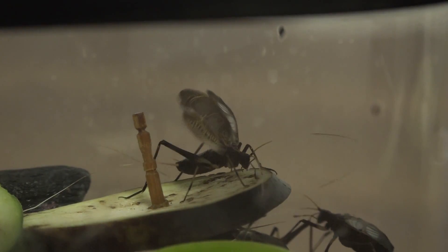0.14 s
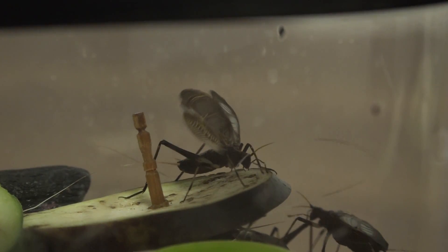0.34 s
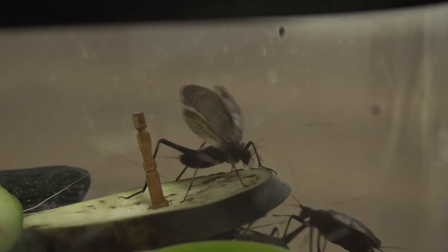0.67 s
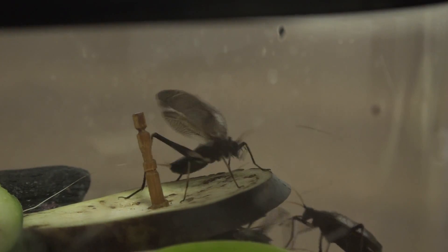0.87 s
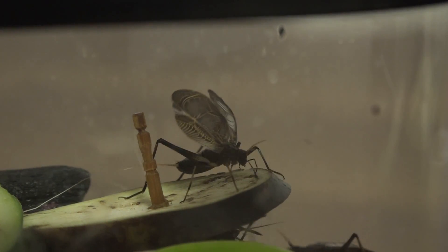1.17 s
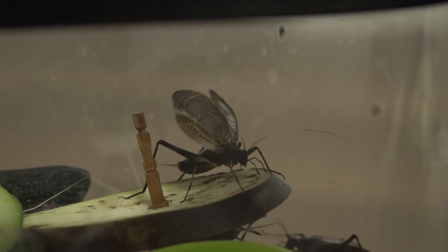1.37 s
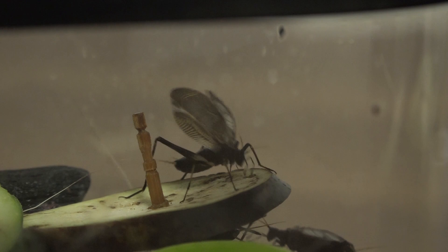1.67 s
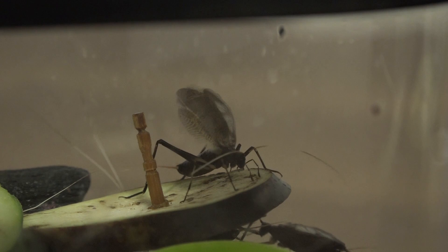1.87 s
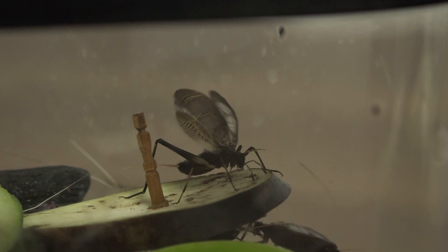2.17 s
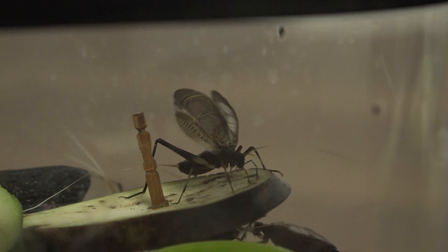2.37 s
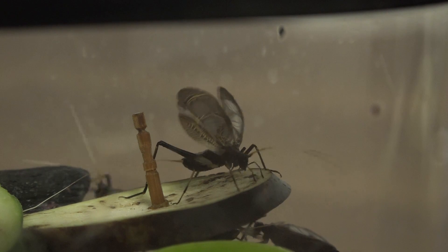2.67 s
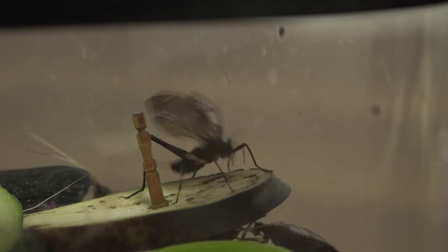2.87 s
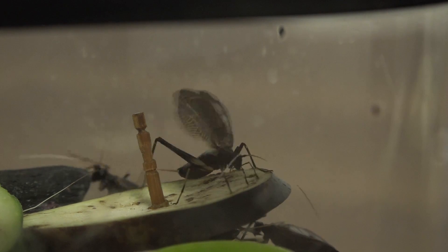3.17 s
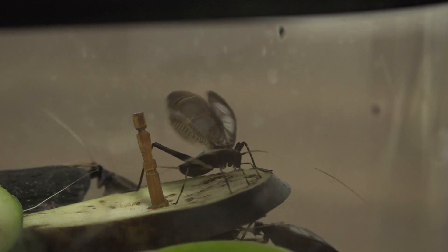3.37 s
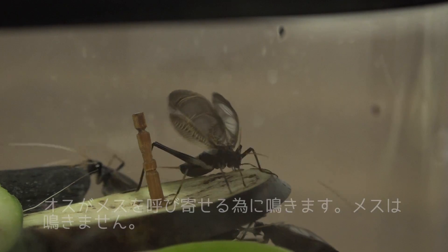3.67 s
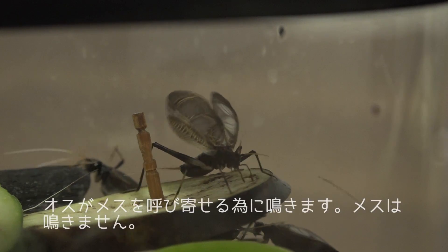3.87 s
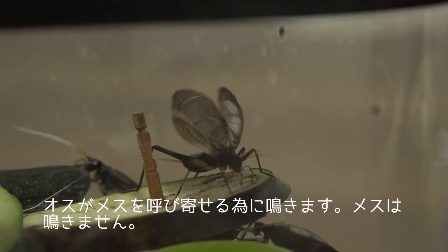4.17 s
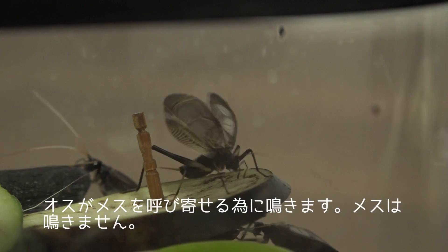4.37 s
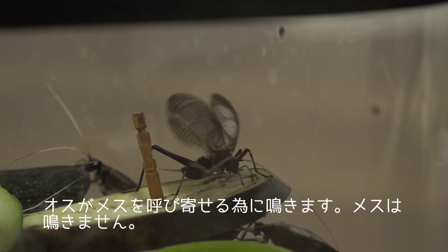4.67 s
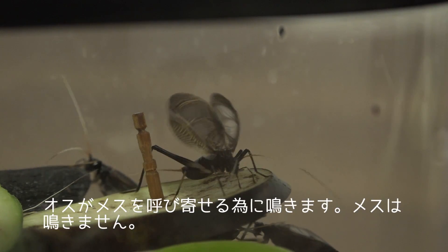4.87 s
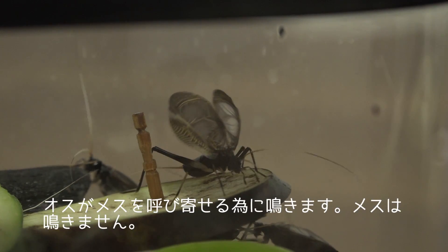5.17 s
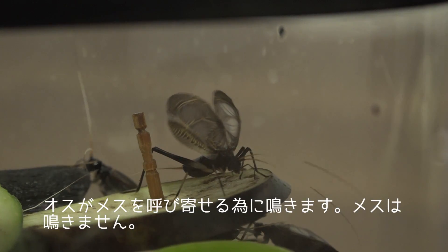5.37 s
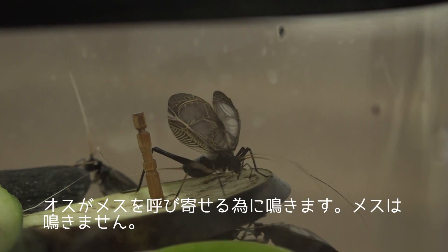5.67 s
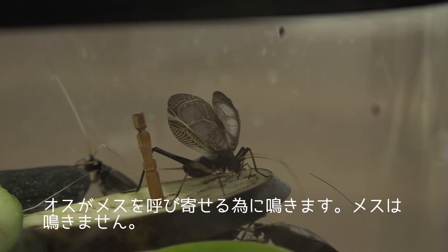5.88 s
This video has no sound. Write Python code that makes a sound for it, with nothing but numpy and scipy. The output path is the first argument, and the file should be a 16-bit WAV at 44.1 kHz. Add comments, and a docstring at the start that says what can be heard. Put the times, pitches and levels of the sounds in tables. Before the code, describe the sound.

In a quiet indoor room, a thin dry insect trill flutters steadily, blurred by hard tank walls. A louder bell cricket joins in separate bursts of clear, high, silvery ringing, strongest in the middle and again just before four seconds, each dying away. Tiny wing-edge scrapes flick past. The close stereo microphone also catches gentle room air and a low, wavering hum, left almost alone at the end.

```python
"""A faint scratchy trill in a quiet, faintly humming room; soon a second bell cricket rings over it.
Both sing in a clear-walled tank near the microphone; the trill stops suddenly just before the end.
Each wing stroke drags a file over a scraper: a short falling tone near 4.6 kHz, overtones, a dry rasp.
The ringing phrases swell and fade, wing edges scratch, and dense wall echoes blur the strokes into a ring.
Behind them: coloured air noise and the wavering sine lines of a mains-driven motor."""
import sys
import numpy as np
from scipy import signal
from scipy.fft import rfft, irfft, next_fast_len
from scipy.io import wavfile
from scipy.ndimage import uniform_filter1d

SR = 44100
rng = np.random.default_rng(int(sys.argv[2]) if len(sys.argv) > 2 else 0)


def unload_wav(signal):
    """Save mono or channel-first audio to the path in sys.argv[1] as 16-bit WAV at rate SR, clipped to [-1, 1]."""
    wavfile.write(
        sys.argv[1],
        SR,
        np.round(np.clip(np.atleast_2d(signal).T, -1, 1) * 32767).astype(np.int16),
    )


N = 266055
T = np.arange(N) / SR  # time [s]

# ringing cricket: (opening stroke time [s], its length [s], its peak [dB], length of following run [s],
# run peak [dB], fade over run [dB], pitch at stroke start [Hz], 2nd harmonic [dB], 3rd harmonic [dB]);
# peaks before the tank, harmonics as for a 0 dB stroke
RINGER_PHRASES = [(0.209, 0.039, -10.5, 0.36, -16, 6.5, 4642, -34, -39.5),
                  (1.957, 0.048, -11.5, 0.36, -14, 1.5, 4652, -35, -38.5),
                  (2.381, .021, -7.5, .22, -7.5, 18, 4620, -36, -42),
                  (3.263, .042, -12.5, 0.51, -14, 9, 4649, -33.5, -38.5),
                  (3.855, .038, -4, .34, -4, 17.5, 4598, -40.5, -39.5),
                  (4.614, 0.039, -12.5, .49, -14, 6.5, 4640, -32.5, -37),
                  (5.178, 0.026, -25.5, 0.52, -28.5, 3, 4623, -34.5, -47.5)]
# effort of the trilling cricket: (time [s], effort [dB])
TRILL_EFFORT = [(.05, -42), (.2, -34.5), (.8, -33.5), (1.8, -31), (2.8, -28.5), (3.6, -30.5), (4.35, -27),
                (5.05, -30.5), (5.3, -38), (5.68, -41.5)]
# wing-edge skids: (time [s], level before the tank [dB], t60 [s])
SCRATCH_EVENTS = [(0.2146, -34, 0.22), (2.018, -42, 0.48), (3.271, -33.5, 0.11), (3.305, -38.5, 0.56),
                  (4.656, -34, 0.11), (5.125, -47.5, 0.13)]
# rasp spectrum before the tank modes: (frequency [Hz], relative level [dB])
RASP_SPECTRUM = [(1500, -25), (3000, -23), (3900, -10), (4600, 9.5), (5100, 3.5), (5750, -8.5),
                 (7200, -9.5), (9000, -6.5), (9700, -15.5), (10800, -21), (11600, -14), (12500, -15.5),
                 (13400, -21), (15700, -13.5)]
# tank modes rung by the rasp: (frequency [Hz], bandwidth [Hz], gain [dB])
TANK_MODES = [(5285, 82, -5), (6225, 120, -0.5), (6590, 130, 0.5), (8290, 220, -7.5)]
# scratch spectrum: (frequency [Hz], relative level [dB])
SCRATCH_SPECTRUM = [(1200, -47), (2500, -16), (4000, -8), (5500, 11.5), (7200, -30), (8300, 5),
                    (10000, -12), (12000, -9.5), (15000, -12)]
# room air spectrum: (frequency [Hz], relative density [dB])
AIR_SPECTRUM = [(15, -28.5), (30, -16), (105, -6), (170, -10.5), (280, -11), (380, -15), (600, -13.5),
                (1050, -12.5), (1500, -18), (2600, -22.5), (3500, -16), (4000, -21), (12000, -23),
                (15500, -30)]
# motor hum lines: (frequency [Hz], rms level [dB])
HUM_LINES = [(49.6, -73), (100, -62), (149, -66.5), (199.5, -71), (299, -74), (732, -79.5), (899, -79.5),
             (1152, -75.5), (1550, -79), (1648, -83.5), (1750, -83)]
# stereo width: (frequency [Hz], side-channel gain [dB])
SIDE_GAIN = [(60, -11.5), (200, -6), (380, -6.5), (700, -9.5), (1300, -15), (2400, -30), (3800, -33.5),
             (4500, -24.5), (5300, -15.5), (7200, -2), (9200, -2), (11200, -5), (11700, -35.5)]

# ringing cricket; the lead-in level is relative to the opening stroke
STROKE_RATE_HZ, STROKE_S, LEAD_IN_DB = 43.2, .024, -5.5
# as it tires, level and pitch sink ever faster
TIRING_POWER, SAG_HZ_PER_DB = 1.486, 3
# trilling cricket: pitch at the start of a stroke, droop within it
TRILL_HZ, TRILL_DROOP_HZ = 4590, 337
# its rasp: level before the tank at 0 dB effort, slope with effort
TRILL_RASP_DB, RASP_DB_PER_EFFORT_DB = -29.5, 0.41
TANK_T60_S, FLUTTER_T60_S = .35, .07
AIR_DB = -60
TRILL_END_S = 5.685
TOP_HZ = 15680


def ringer():
    """The ringing cricket: clean resonant wing strokes in phrases, with a faint friction rasp."""
    tone, force = np.zeros(N), np.zeros(N)
    for *shape, second_db, third_db in RINGER_PHRASES:
        phrase_tone, phrase_force = wings(phrase(*shape), overtones_db=(second_db, third_db),
                                          jitter_hz=21.9, slip_cycles=0.15, swell_power=1.22)
        tone += phrase_tone
        force += phrase_force
    rasp = undb(-50) * force * rasp_noise()
    return tank(tone, wet_db=-4.5) + tank(rasp, wet_db=8)


def phrase(s, opening_s, opening_db, run_s, level_db, fade_db, pitch_hz,
           droop_hz=120, scatter_db=1.53, timing_s=.0008):
    """A light lead-in, a firm opening stroke, then an uneven run that fades and sags as the cricket tires."""
    gap_s = (opening_s + 1 / STROKE_RATE_HZ) / 2
    strokes = [(s - gap_s, opening_db + LEAD_IN_DB, STROKE_S, pitch_hz, droop_hz),
               (s, opening_db, opening_s, pitch_hz, droop_hz)]
    ages_s = np.arange(0, run_s, 1 / STROKE_RATE_HZ)
    losses_db = fade_db * (ages_s / run_s) ** TIRING_POWER
    chance = rng.standard_normal((len(ages_s), 2))
    for age_s, lost_db, (late, loud) in zip(ages_s, losses_db, chance):
        stroke_s = s + gap_s + age_s + timing_s * late
        stroke_db = level_db - lost_db + scatter_db * loud
        stroke_hz = pitch_hz - SAG_HZ_PER_DB * lost_db
        strokes.append((stroke_s, stroke_db, STROKE_S, stroke_hz, droop_hz))
    return strokes


def triller(stroke_rate_hz=43.3, length_s=0.0168, peak_db=8.0, scatter_db=0.5, timing_s=0.00097, grain_db=2):
    """Light, quick strokes that sweep widely and scrape, heard mostly by way of the walls."""
    effort_db = np.interp(T, *np.transpose(TRILL_EFFORT))
    turns = np.cumsum(stroke_rate_hz * (1 + 0.0252 * walk(3))) / SR
    new_turn = np.diff(np.floor(turns), prepend=-1) > 0
    i = np.flatnonzero(new_turn & (T < TRILL_END_S))
    late, loud, sharp = rng.standard_normal((len(i), 3)).T
    strokes = np.column_stack([T[i] + timing_s * late,
                               effort_db[i] + peak_db + scatter_db * loud,
                               np.full(len(i), length_s),
                               TRILL_HZ + 18 * sharp,
                               np.full(len(i), TRILL_DROOP_HZ)])
    tone, force = wings(strokes, overtones_db=(-35.5, -40.5),
                        jitter_hz=60.4, slip_cycles=0.871, swell_power=1.12)
    # the teeth catch unevenly: fine grains
    grains = undb(grain_db * walk(900))
    rasp_db = TRILL_RASP_DB + RASP_DB_PER_EFFORT_DB * effort_db
    rasp = unit(force * grains * rasp_noise()) * undb(rasp_db)
    return tank(tone, wet_db=8.5) + tank(rasp, wet_db=7)


def wings(strokes, overtones_db, jitter_hz, slip_cycles, swell_power):
    """Tone and contact force of file strokes (time [s], peak [dB], length [s], start pitch [Hz], droop [Hz])."""
    tone, force = np.zeros(N), np.zeros(N)
    unevenness_hz = jitter_hz * walk(500)
    strokes = np.array(sorted(map(tuple, strokes)))
    # the wing still rings when the next stroke takes hold: phase carries over, give or take a slip
    ringing_cycles = np.cumsum(np.interp(T, strokes[:, 0], strokes[:, 3])) / SR
    slips_cycles = slip_cycles * rng.standard_normal(len(strokes))
    for (s, db, length_s, _, droop_hz), slip in zip(strokes, slips_cycles):
        first = max(int((s - length_s / 2) * SR), 0)
        last = min(int((s + length_s / 2) * SR), N)
        i = np.arange(first, last)
        travel = np.clip((T[i] - s) / length_s + .5, 0, 1)
        # the file slows as the wings close: pitch droops late in the stroke
        bend_cycles = np.cumsum(unevenness_hz[i] - droop_hz * travel ** 3) / SR
        phase = 2 * np.pi * (ringing_cycles[i] + slip + bend_cycles)
        grip = np.sin(np.pi * travel) ** swell_power
        tone[i] += undb(db) * grip * np.sin(phase)
        # a firm stroke locks to the wing's resonance: overtones grow half as fast in dB
        overtones = sum(undb(d) * np.sin(k * phase) for k, d in enumerate(overtones_db, 2))
        tone[i] += undb(db * .5) * grip * overtones
        force[i] += grip
    return tone, force


def rasp_noise():
    """Friction noise that rings the tank modes, rms 1."""
    friction = noise(RASP_SPECTRUM)
    rasp = friction.copy()
    for hz, width_hz, db in TANK_MODES:
        b, a = signal.iirpeak(hz, hz / width_hz, fs=SR)
        rasp += undb(db) * signal.lfilter(b, a, friction)
    return unit(rasp)


def scratches():
    """A wing edge skids over the file: a bright noise burst that trails off."""
    envelope = np.zeros(N)
    for s, db, t60_s in SCRATCH_EVENTS:
        envelope += (T >= s) * undb(db - 60 * np.maximum(T - s, 0) / t60_s)
    return tank(envelope * noise(SCRATCH_SPECTRUM), wet_db=-6.5)


def tank(x, wet_db, flutter_db=2):
    """Dense wall echoes, a quick flutter and a longer ring, at unchanged rms; side gets echoes only."""
    t = T[:SR // 2]
    ring = undb(-60 * t / TANK_T60_S)
    flutter = undb(flutter_db - 60 * t / FLUTTER_T60_S)
    walls = rng.standard_normal((2, len(t))) * (ring + flutter) * (t > .001)
    echo, side = (unit(signal.fftconvolve(x, wall)[:N]) for wall in walls)
    mid = unit(unit(x) + undb(wet_db) * echo)
    return np.std(x) * np.array([mid, side])


def room(swell_db=-1.13, waver_db=0.75, drift_hz=0.21):
    """Softly swelling air noise and slightly wavering motor lines, as mid and side."""
    air = np.array([noise(AIR_SPECTRUM), noise(AIR_SPECTRUM)])
    air *= undb(AIR_DB + swell_db * walk(4.04))
    hum = np.zeros(N)
    for hz, db in HUM_LINES:
        amplitude = np.sqrt(2) * undb(db + waver_db * walk(2.6))
        phase = 2 * np.pi * np.cumsum(hz + drift_hz * walk(2)) / SR
        hum += amplitude * np.sin(phase)
    return air + np.outer([1, .35], hum)


def limiter(x, threshold_db=-8, ratio=2.55, recovery_db_per_s=4):
    """The loudest strokes turn the gain down at once; it creeps back."""
    peak_db = 20 * np.log10(np.abs(x).max(axis=0) + 1e-9)
    over_db = np.maximum(peak_db - threshold_db, 0) * (1 - 1 / ratio)
    recovered_db = recovery_db_per_s * T
    cut_db = np.maximum.accumulate(over_db + recovered_db) - recovered_db
    return x * undb(-uniform_filter1d(cut_db, size=128))


def undb(db):
    """Decibels to gain."""
    return 10 ** (np.asarray(db) / 20)


def unit(x):
    """Scale to rms 1."""
    return x / np.sqrt(np.mean(x ** 2))


def colour(x, points):
    """Filter by (frequency [Hz], gain [dB]) points joined on a log-frequency axis."""
    hz, db = np.transpose(points)
    size = 2 * next_fast_len(N)
    bins_hz = np.fft.rfftfreq(size, 1 / SR)
    gain = undb(np.interp(np.log(bins_hz + 1), np.log(hz), db))
    return irfft(rfft(x, size) * gain)[:N]


def noise(points):
    """Coloured noise of rms 1."""
    return unit(colour(rng.standard_normal(N), points))


def walk(rate_hz):
    """Smooth chance of rms 1 that changes about rate_hz times a second."""
    k = max(int(SR / rate_hz), 2)
    steps = np.repeat(rng.standard_normal(N // k + 1), k)
    return unit(uniform_filter1d(steps, k)[:N])


def scene():
    """Crickets and room as mid and side, turned into left and right."""
    mid, side = ringer() + triller() + scratches() + room()
    side = colour(side, SIDE_GAIN)
    return np.array([mid + side, mid - side])


def record(dry):
    """The recorder limits the peaks and cuts the top steeply."""
    top_cut = signal.ellip(12, .1, 80, TOP_HZ, fs=SR, output="sos")
    return signal.sosfilt(top_cut, limiter(dry))


dry = scene()
out = record(dry)
unload_wav(out)
```